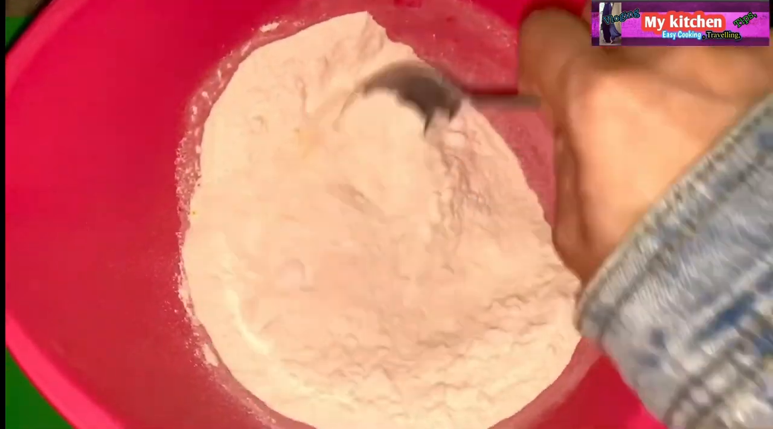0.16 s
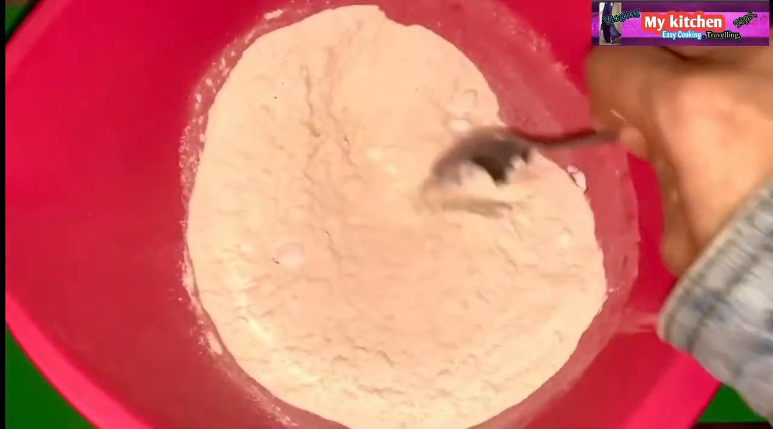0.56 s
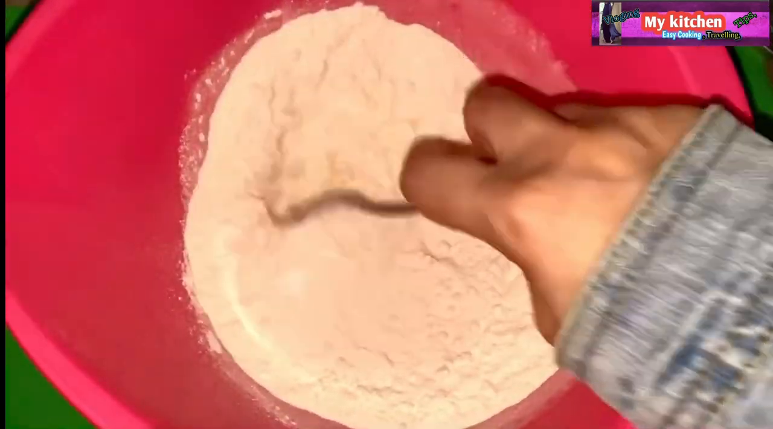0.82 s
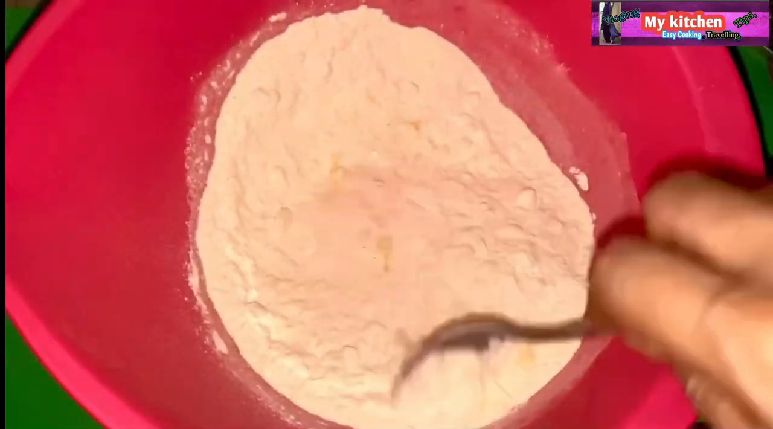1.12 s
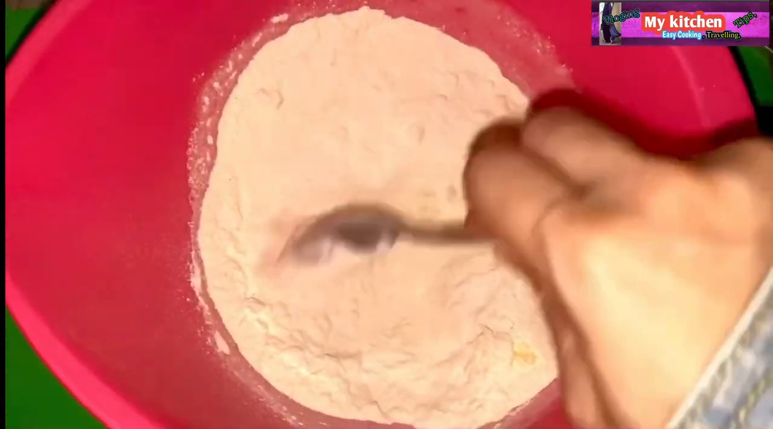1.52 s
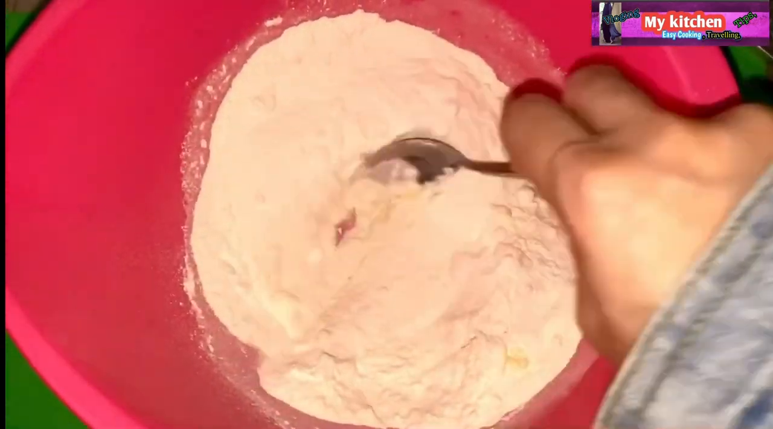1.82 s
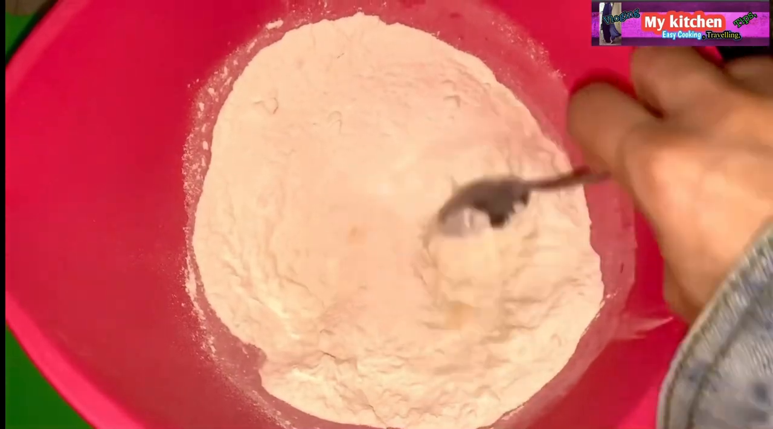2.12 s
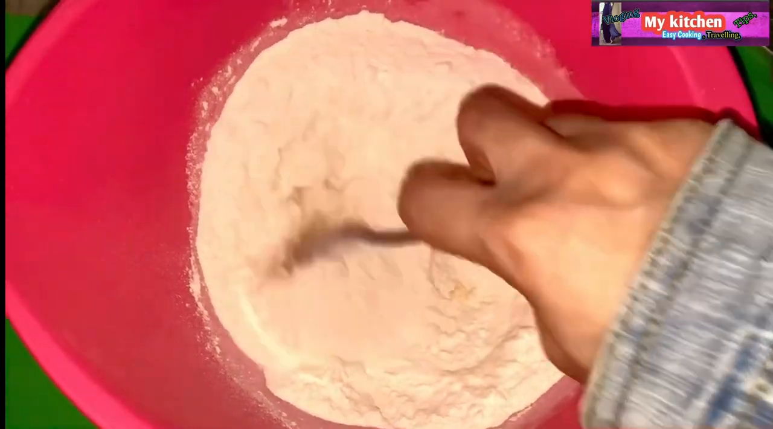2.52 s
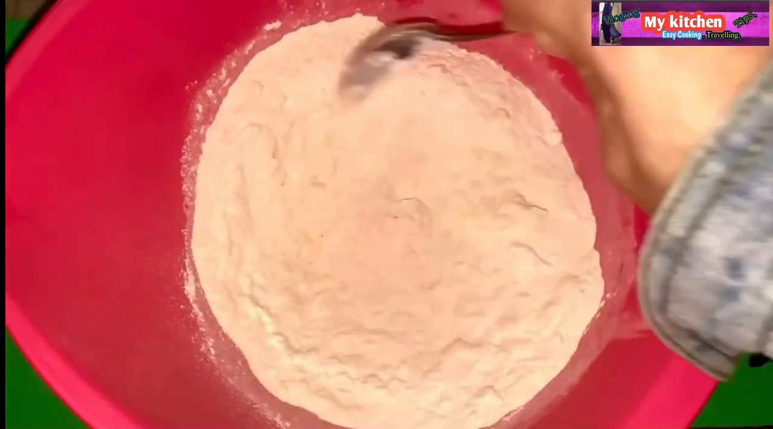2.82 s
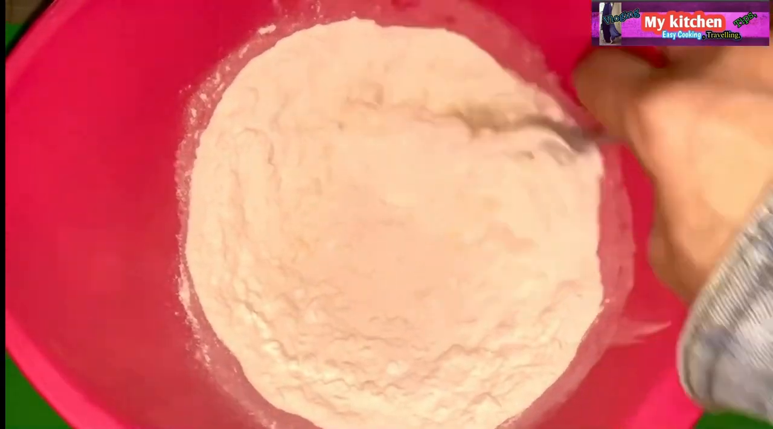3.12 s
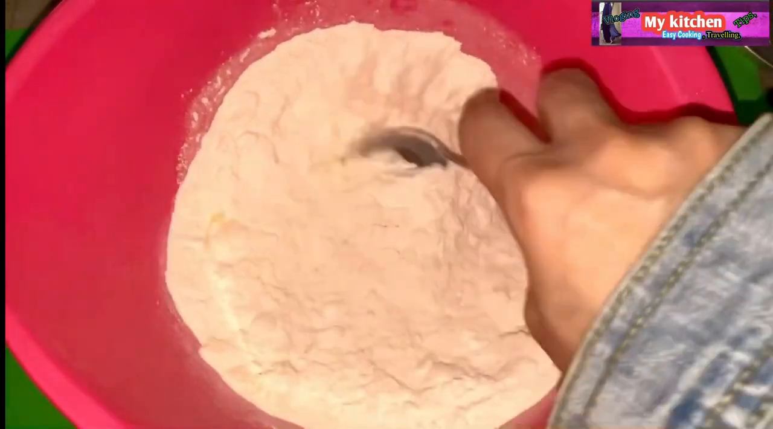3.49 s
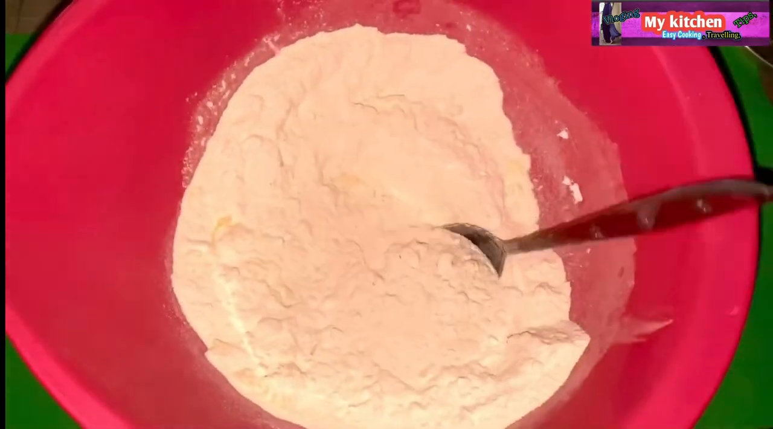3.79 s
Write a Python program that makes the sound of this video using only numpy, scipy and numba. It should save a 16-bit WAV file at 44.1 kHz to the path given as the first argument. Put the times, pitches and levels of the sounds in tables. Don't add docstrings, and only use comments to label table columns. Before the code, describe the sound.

Metal spoon stirring flour in a plastic bowl, with dull knocks, gritty drags and a closing clatter

```python
import sys
import numpy as np
from scipy import signal
from scipy.io import wavfile
from scipy.ndimage import uniform_filter1d
from numba import njit

SR = 44100
rng = np.random.default_rng(int(sys.argv[2]) if len(sys.argv) > 2 else 0)


def convert_level_to_amplitude(level_db):
    exponent = np.asarray(level_db, float) / 20
    return 10 ** exponent


def materialize(psi):
    bounded = np.clip(np.atleast_2d(psi).T, -1, 1)
    quanta = np.round(bounded * 32767).astype(np.int16)
    wavfile.write(sys.argv[1], SR, quanta)


N = 174195
STEP = 32


@njit
def twice(x, pole, gain):
    out, a, b = np.empty(len(x), np.complex128), 0j, 0j
    for i in range(len(x)):
        a = a * pole + x[i] + 1e-18
        b = b * pole + a
        out[i] = b * gain
    return out


def ring(x, hz, q):
    radius = np.exp(-np.pi * hz / q / SR)
    pole = radius * np.exp(2j * np.pi * hz / SR)
    return twice(x, pole, 2 * (1 - radius) ** (3 / 2))


def read(table, hz, column=1):
    table = np.array(table)
    return np.interp(np.log(hz), np.log(table[:, 0]), table[:, column])


def unit(x):
    return x / np.sqrt(np.mean(np.abs(x) ** 2))


def fine(points):
    return np.interp(np.arange(N) / STEP, np.arange(len(points)), points)


def walk(rate):
    n, hold = N // STEP + 1, int(SR / STEP / rate)
    levels = np.repeat(rng.standard_normal(n // hold + 1), hold)
    smooth = uniform_filter1d(uniform_filter1d(levels, hold), hold)
    return unit(smooth[:n])


# (pitch [Hz], left minus right [dB], left leads by [rad])
PORT_DIFFERENCE = [(344, 2, 0.0061), (700, -3, -1.23), (1230, 1, -0.4), (1950, -6, -1.3), (2900, -12, -1),
                   (4050, -4.5, 0.07), (6500, -12.5, -1.64), (7600, 0, 3.44)]
PORTS_JOIN_HZ, PORT_TURN_HZ = 9300, 1100


def ports(z, hz, chance, left_db):
    apart = min(hz / 340, 1) * (hz < PORTS_JOIN_HZ)
    left_db = apart * (left_db + read(PORT_DIFFERENCE, hz) + 6.6 * chance)
    lead = read(PORT_DIFFERENCE, hz, column=2) + 0.77 * chance * min(hz / PORT_TURN_HZ, 1)
    left = (z * np.exp(1j * apart * lead)).real
    return np.array([left * convert_level_to_amplitude(left_db / 2), z.real * convert_level_to_amplitude(-left_db / 2)])


# (pitch [Hz], level [dB])
KITCHEN_AIR = [(25, -6), (60, -8.5), (145, -1.5), (490, -10.5), (960, -24), (2000, -24), (3600, -37.5),
               (5800, -33.5), (9000, -48)]
KITCHEN_DB, KITCHEN_LEFT_DB, ALIKE_HZ = -43.5, -1.8, 350
# (pitch [Hz], level [dB])
FAN_TONES = [(58, -53.5), (99, -49.5), (147, -46.5), (202, -49), (250, -60.5), (298, -57)]
FAN_WAVER_DB, FAN_WAVER_HZ = 2, 2.96


def kitchen_air():
    out, slow = 0, walk(3.97)
    for hz in 36 * 2 ** np.arange(0, 8.4, 1 / 3):
        mid = ring(rng.standard_normal(N), hz, 2.72)
        side = ring(rng.standard_normal(N), hz, 2.72)
        most = 0.8 if hz < PORTS_JOIN_HZ else 0.1
        share = np.clip(0.29 + (hz / ALIKE_HZ) ** 2 / 2, 0, most)
        drift_db = slow / 2 + 1.5 * walk(7.5)
        gain = fine(convert_level_to_amplitude(read(KITCHEN_AIR, hz) + drift_db)) * np.sqrt(hz / (1 + share ** 2))
        spread = share * side.real * np.array([[1], [-1]])
        out = out + gain * (ports(mid, hz, 0, KITCHEN_LEFT_DB) + spread)
    return unit(out) * convert_level_to_amplitude(KITCHEN_DB)


def fan():
    hum = 0
    for hz, db in FAN_TONES:
        level = fine(convert_level_to_amplitude(db + FAN_WAVER_DB * walk(29)))
        pitch = hz + FAN_WAVER_HZ * fine(walk(14))
        hum = hum + level * np.sin(2 * np.pi * np.cumsum(pitch) / SR)
    return hum * convert_level_to_amplitude(np.array([[0.7], [-0.7]]))


# (pitch [Hz], level [dB])
WALL_MODES = [(150.2, 4.5), (229.5, -1.5), (332.4, -3), (453, 1.5), (590, 2.5), (700, -0.5), (945, -4),
              (1220, -1), (1390, -3), (3240, -6.5), (1890, -2.5), (2091, -0.5), (2407, -20), (2750, -5.5)]
# (pitch [Hz], level [dB])
SPOON_MODES = [(2550, -7), (3200, -12.5), (4000, -12.5), (5000, -10.5), (6500, -6), (7400, 0),
               (10500, -1.5), (14800, -7)]
# (time [s], level [dB], pitch [Hz], time to fade 60 dB [s], crack level [dB])
KNOCK_EVENTS = [(.14, -56, 350, 0.022, -30), (0.2485, -18, 1923, 0.0067, -13),
                (.251, -18.5, 1170, 0.0063, -37), (.364, -24, 973, 0.018, -18), (.6295, -27, 1307, 0.01, 4),
                (.631, -31, 590, 0.016, -34), (.699, -36, 1610, 0.013, -9),
                (.7105, -30.5, 1950, 0.0093, -36), (.779, -15.5, 260, 0.032, -18),
                (1.5765, 1, 231, 0.015, -38), (1.5735, -10, 555, 0.018, -37),
                (1.591, -22.5, 187.8, 0.11, -40), (3.13, -33, 604, 0.015, -11),
                (3.133, -24.5, 191, 0.043, -40), (3.389, -42, 2100, .012, -18),
                (3.389, -44, 800, 0.0088, -30.5), (3.552, -22, 2100, .012, -10),
                (3.564, -16, 717, 0.0078, -14), (3.583, -22, 700, .014, -26),
                (3.7184, 1, 1800, 0.0055, -19), (3.721, -11, 1250, 0.015, -30),
                (3.7185, -11, 650, .02, -40), (3.7245, -19, 2100, .008, -30), (3.721, -13, 420, 0.024, -44),
                (3.735, -25.5, 204, 0.1, -76), (3.755, -24, 1660, 0.032, -24),
                (3.863, -30, 4320, 0.0037, -9)]
KNOCK_DB_PER_OCT, CRACK_S = 19, 0.0017
DAMPING, RISE_CYCLES = 2.0, 1.1
TABLE_HZ, TABLE_T60_S, TABLE_DB = 58, 0.4, -24


def knocks():
    out, t = np.zeros((2, N + SR)), np.arange(SR // 6) / SR
    for s, db, pitch, t60, crack_db in KNOCK_EVENTS:
        chances = rng.standard_normal((len(WALL_MODES) + 1, 3))
        here = slice(int(s * SR), int(s * SR) + len(t))
        onset = 2 * (1 - np.exp(-t * pitch / RISE_CYCLES)) ** 2
        for (hz, mode_db), (a, b, d) in zip(WALL_MODES + [(pitch, 0)], chances):
            if max(hz / pitch, pitch / hz) > 3:
                continue
            cycles = hz * (1 + 0.035 * a) * t + b * min(hz / 2500, 1) ** 2 - 1 / 4
            fade = np.log(1000) * (t * np.sqrt(hz / pitch) / t60) ** DAMPING
            z = onset * np.exp(2j * np.pi * cycles - fade)
            far_db = KNOCK_DB_PER_OCT * abs(np.log2(hz / pitch))
            out[:, here] += ports(z, hz, d, 1.6) * convert_level_to_amplitude(db + mode_db - 5 - far_db)
        jolt = rng.standard_normal(len(t)) * np.exp(-t / CRACK_S) * (1 - np.exp(-t / 0.00016))
        crack = 0
        for (hz, mode_db), (a, b, d) in zip(SPOON_MODES, chances):
            z = ring(jolt, 1.0 * hz, 5.6)
            crack = crack + ports(z, min(hz, PORT_DIFFERENCE[-1][0]), d, 2.9) * convert_level_to_amplitude(mode_db + 1.2 * a)
        thump = np.sin(2 * np.pi * TABLE_HZ * t) * np.exp(-np.log(1000) * t / TABLE_T60_S)
        thump = thump * (1 - np.exp(-t / 0.0033)) * (1 - t / t[-1])
        thump = thump * (220 / pitch) ** 2
        out[:, here] += crack * convert_level_to_amplitude(db + crack_db) + thump * convert_level_to_amplitude(db + TABLE_DB)
    return out[:, :N]


SQUARE = 1.88


def swell(peak, rise, fall):
    dt = np.arange(N // STEP + 1) * STEP / SR - peak
    return np.exp(-np.abs(dt / np.where(dt < 0, rise, fall)) ** SQUARE)


GRAINS_PER_S, GRAIN_SPREAD_DB, JUDDER_DB = 5000, 2.5, 3


def grains():
    hit = rng.random(N) < GRAINS_PER_S / SR
    size_db = GRAIN_SPREAD_DB * rng.exponential(size=N) + JUDDER_DB * fine(walk(150))
    return unit(hit * rng.standard_normal(N) * convert_level_to_amplitude(size_db))


# (peak time [s], rise [s], fall [s], level [dB], tilt [dB per octave])
DRAGS = [(.19, 0.03, 0.063, -53, 1), (0.315, 0.014, 0.054, -36, -0.5), (0.347, 0.012, 0.018, -24, -0.5),
         (0.364, 0.0052, 0.012, -28.5, -1.3), (0.779, 0.009, 0.046, -42.5, 4),
         (0.829, 0.025, 0.018, -30.5, 0.65), (.88, 0.068, 0.045, -47, -1),
         (1.179, 0.037, 0.056, -43.5, -0.5), (1.351, 0.035, 0.02, -46.5, -1),
         (1.41, 0.048, 0.046, -57, 1.5), (1.583, 0.011, 0.026, -33.5, -0.5), (1.624, 0.013, 0.01, -35.5, 2),
         (3.05, 0.044, .04, -64, 4.5), (1.67, 0.045, 0.029, -55, 2.3), (1.757, 0.043, 0.011, -41, 1),
         (2.11, .03, 0.034, -64, 2), (2.504, 0.033, 0.064, -34, -4.5), (2.557, 0.078, 0.023, -38, 4.5),
         (2.447, 0.0036, 0.096, -54.5, -11.5), (2.62, 0.071, 0.067, -53.5, 0.5),
         (2.88, 0.043, 0.099, -73.5, 7.5), (3.112, 0.032, 0.025, -46.5, 3), (3.154, 0.012, 0.031, -46.5, 3),
         (3.525, 0.01, 0.018, -33, 0), (3.561, 0.017, 0.027, -30.5, -1.5), (3.62, 0.026, 0.057, -48, -4.8),
         (3.759, 0.04, .04, -40, 0.5), (3.83, 0.034, 0.094, -47.5, 0.5)]
# (pitch [Hz], level [dB])
BOTTOM_MODES = [(140, -15), (215, -9.5), (300, -10.5), (430, -11.5), (580, -5), (720, -6), (1000, -15),
                (1280, -10), (1600, -9), (1950, -8.5), (2180, -17.5), (2750, -9), (3150, -12)]
# (pitch [Hz], level [dB])
FLOUR_HISS = [(3700, -16), (5000, -18), (7000, -16.5), (9000, -17), (11000, -20), (13000, -36),
              (15500, -21)]
BOWL_Q, PATCH_DB = 4.7, 3.5


def bottom():
    shapes = np.array([swell(*drag[:3]) for drag in DRAGS])
    db, tilt = np.array(DRAGS)[:, 3:].T
    out, shared = 0, grains()
    hiss = [(hz, read(FLOUR_HISS, hz)) for hz in 3700 * 2 ** np.arange(0, 2.2, 1 / 5)]
    for hz, mode_db in BOTTOM_MODES + hiss:
        press = convert_level_to_amplitude(db + tilt * np.log2(max(hz, 350) / 1500)) @ shapes
        press = press * convert_level_to_amplitude(PATCH_DB * min(hz / 1000, 1) * walk(70))
        push = fine(press) * (shared + 0.73 * rng.standard_normal(N))
        z = ring(push, hz, BOWL_Q * min(hz / 1000, 1) ** 0.5) * convert_level_to_amplitude(mode_db)
        out = out + ports(z, hz, rng.standard_normal(), -1.1)
    return out


# (peak time [s], rise [s], fall [s], level [dB], pitch [Hz])
WALL_RUBS = [(.41, 0.035, 0.049, -43.5, 1610), (1.18, 0.03, 0.033, -40, 1890),
             (3.567, 0.014, 0.016, -17.5, 2080), (.35, 0.033, 0.025, -24.5, 1100),
             (1.6, 0.034, 0.084, -37.5, 570), (1.65, 0.044, .08, -34, 297), (2.5, 0.049, 0.019, -31, 630),
             (2.505, 0.042, 0.024, -38.5, 1380), (0.704, 0.015, 0.0031, -38, 1950),
             (.83, 0.02, 0.016, -28.5, 2040), (.83, .02, 0.0099, -24.5, 398),
             (0.311, .005, 0.0051, -30, 2780), (1.591, 0.0065, 0.0036, -36, 2020),
             (1.6, 0.012, 0.0089, -28.5, 3020), (1.624, 0.014, 0.0086, -31, 2900),
             (2.475, 0.019, 0.013, -36, 605), (2.54, 0.011, .008, -33, 2750),
             (2.563, .01, 0.023, -27.5, 2740), (2.586, 0.023, 0.0029, -30.5, 290),
             (3.19, 0.12, 0.098, -34, 199), (3.125, 0.0075, 0.0082, -36, 2750),
             (3.556, 0.0045, 0.025, -34, 3000), (3.4, 0.016, .03, -51, 2750),
             (3.535, 0.012, 0.015, -27, 2030), (3.557, 0.0072, 0.01, -19.5, 1970),
             (3.711, 0.0061, 0.0062, -41, 925), (3.562, 0.0067, 0.0067, -54, 676),
             (3.586, 0.0046, 0.034, -36, 1590), (3.74, 0.027, 0.013, -23.5, 540),
             (3.761, 0.0059, 0.0091, -23.5, 1360), (3.799, 0.072, 0.02, -26.5, 1110),
             (3.82, .035, .035, -40, 1860), (3.825, .02, 0.025, -34, 640),
             (3.829, 0.012, 0.041, -34.5, 1260)]
WALL_Q, REACH_DB_PER_OCT, LET_GO_S = 5.9, 14, 3.7


def wall():
    shapes = np.array([swell(*rub[:3]) for rub in WALL_RUBS])
    db, pitch = np.array(WALL_RUBS)[:, 3:].T
    out, shared = 0, grains()
    for (hz, mode_db), chance in zip(WALL_MODES, rng.standard_normal(len(WALL_MODES))):
        press = convert_level_to_amplitude(db - REACH_DB_PER_OCT * abs(np.log2(hz / pitch))) @ shapes
        push = fine(press) * (shared + rng.standard_normal(N))
        out = out + ports(ring(push, hz, WALL_Q) * convert_level_to_amplitude(mode_db - 7), hz, chance, 0)
    right_db = np.where(np.arange(N) < LET_GO_S * SR, 0.6, -1.2)
    return out * convert_level_to_amplitude(np.outer([-1, 1], right_db))


ROOM_T60_S, ROOM_DB, ROOM_TOP_HZ = 0.45, -29, 1400


def room(x):
    t = np.arange(SR // 2) / SR
    fade = np.exp(-np.log(1000) * t / ROOM_T60_S) * (1 - np.exp(-t / 0.054))
    tail = rng.standard_normal((2, len(t))) * fade
    tail = signal.lfilter(*signal.butter(1, ROOM_TOP_HZ, fs=SR), tail)
    tail = tail / np.sqrt(np.sum(tail ** 2) / 2)
    return signal.fftconvolve(x, tail, axes=1)[:, :N] * convert_level_to_amplitude(ROOM_DB)


def scene():
    behind = kitchen_air() + fan()
    bowl = knocks() + bottom() + wall()
    return behind + bowl + room(bowl)


def top_cut(x):
    return signal.sosfilt(signal.butter(12, 16800, fs=SR, output="sos"), x)


# (pitch [Hz], width [Hz])
TREBLE_GAPS = [(8850, 980), (13500, 2040)]
CEILING, TOP_HZ, BASS_HZ = 1.15, 15800, 36


def record(dry):
    dry = np.clip(dry, -CEILING, CEILING)
    for hz, width in TREBLE_GAPS:
        edges = [hz - width / 2, hz + width / 2]
        dry = signal.sosfilt(signal.butter(3, edges, "bandstop", fs=SR, output="sos"), dry)
    dry = signal.sosfilt(signal.ellip(8, 0.2, 60, TOP_HZ, fs=SR, output="sos"), dry)
    dry = signal.lfilter(*signal.butter(2, BASS_HZ, "high", fs=SR), dry)
    return top_cut(dry)


dry = scene()
out = record(dry)
materialize(out)
```